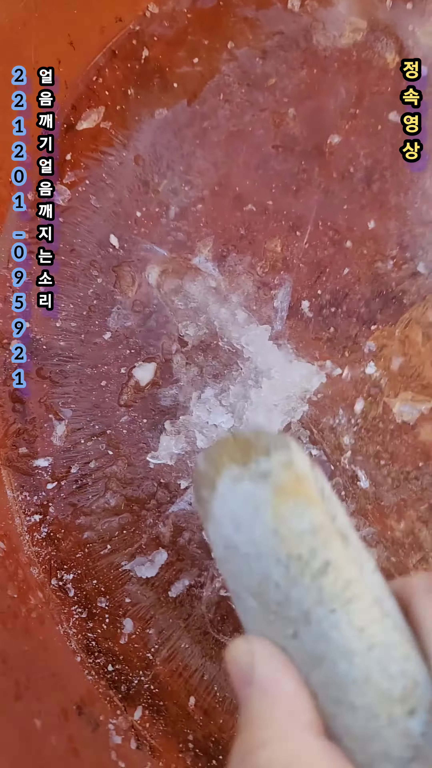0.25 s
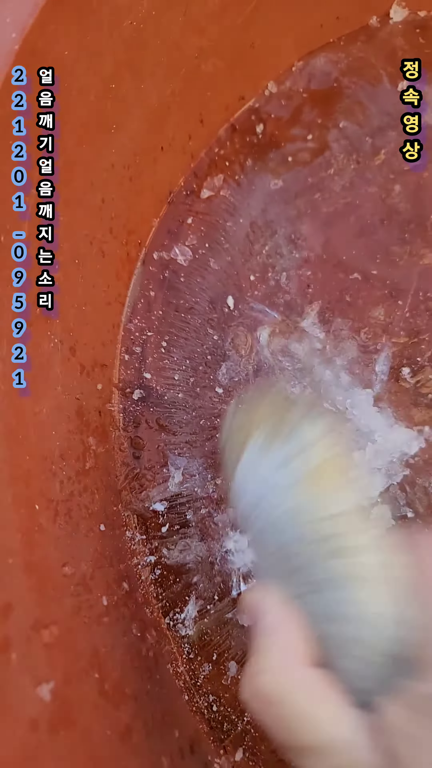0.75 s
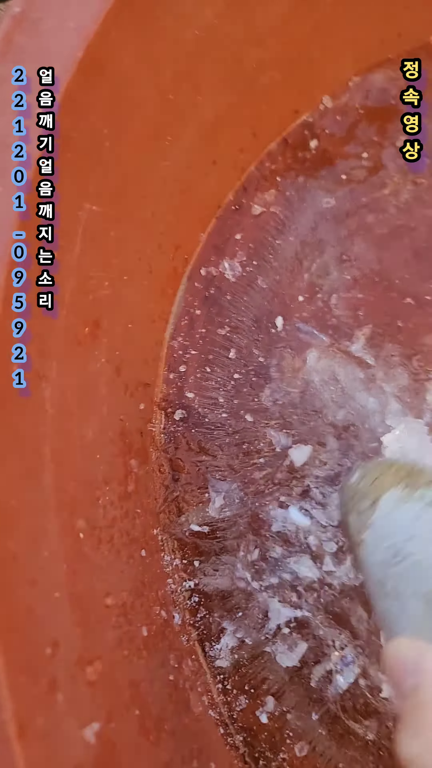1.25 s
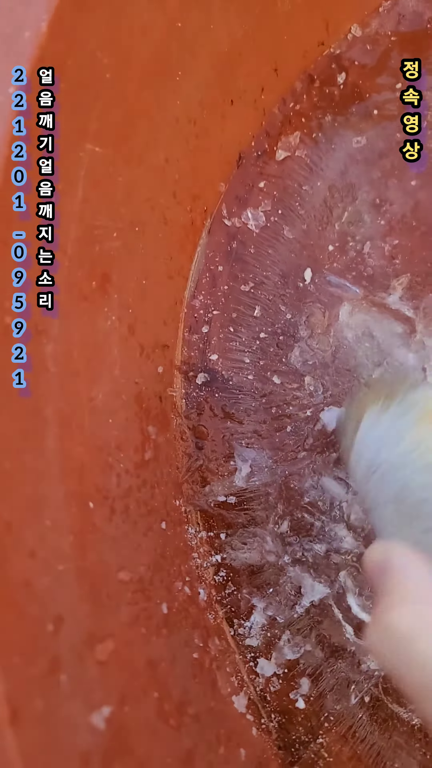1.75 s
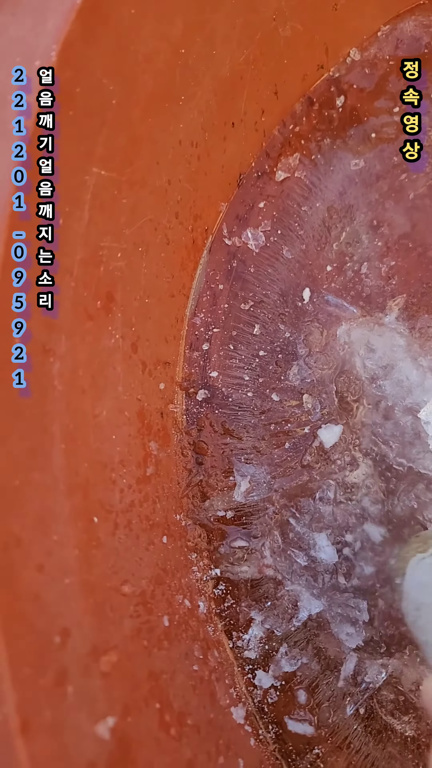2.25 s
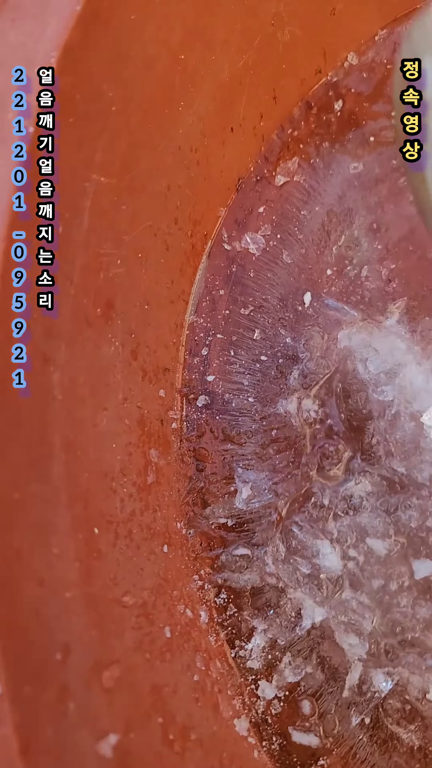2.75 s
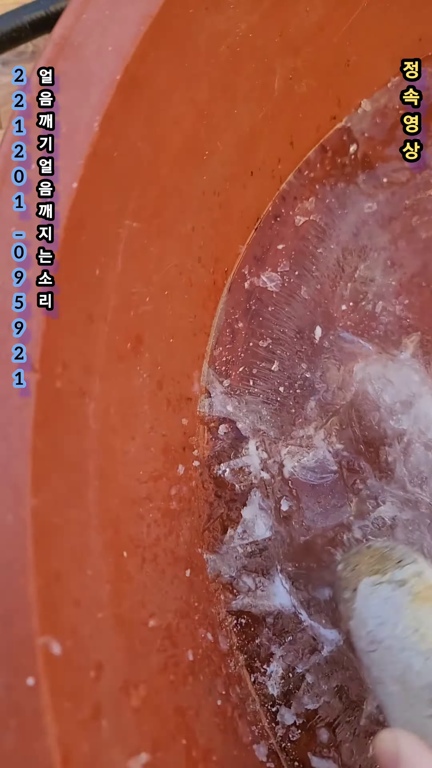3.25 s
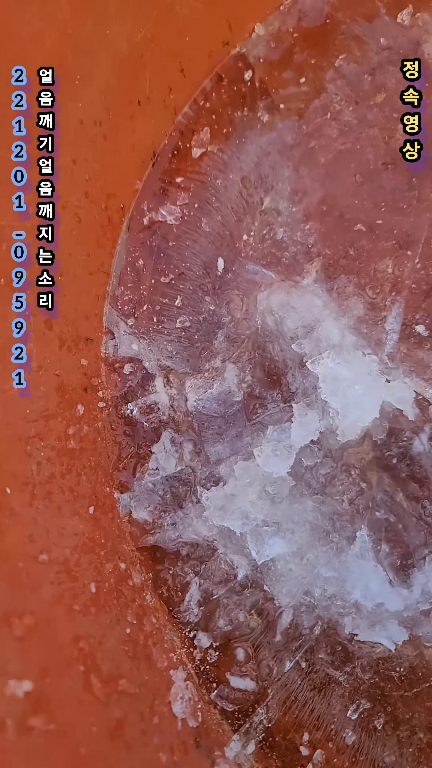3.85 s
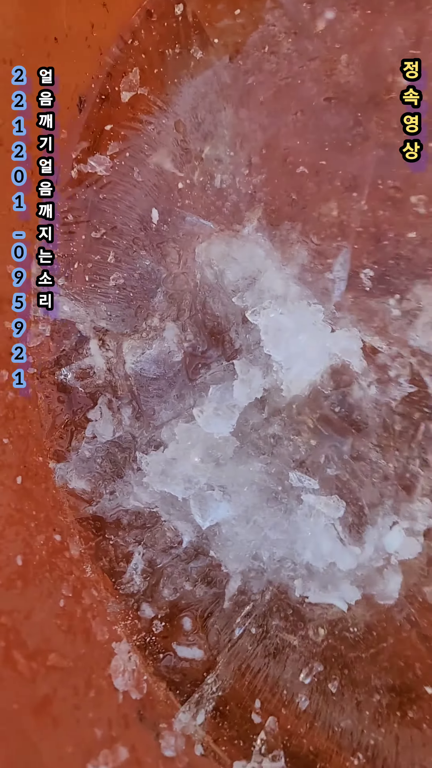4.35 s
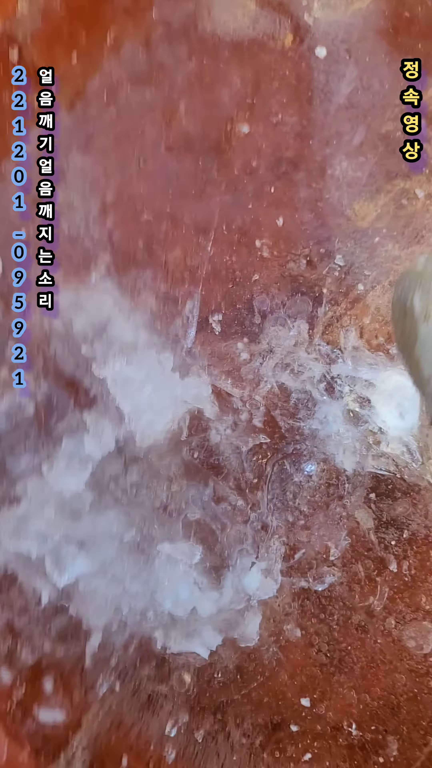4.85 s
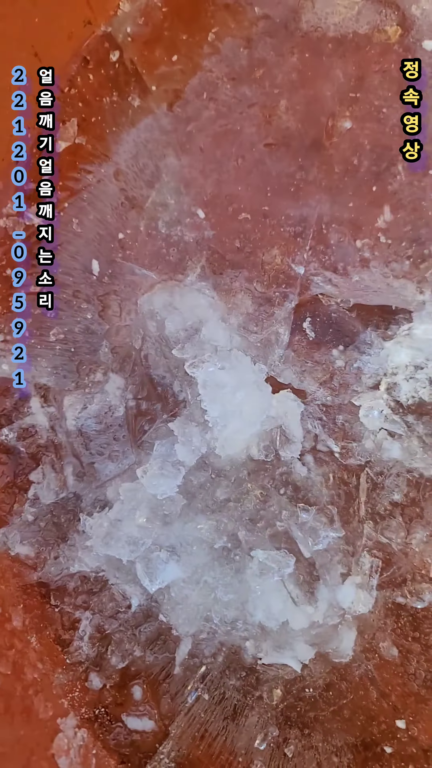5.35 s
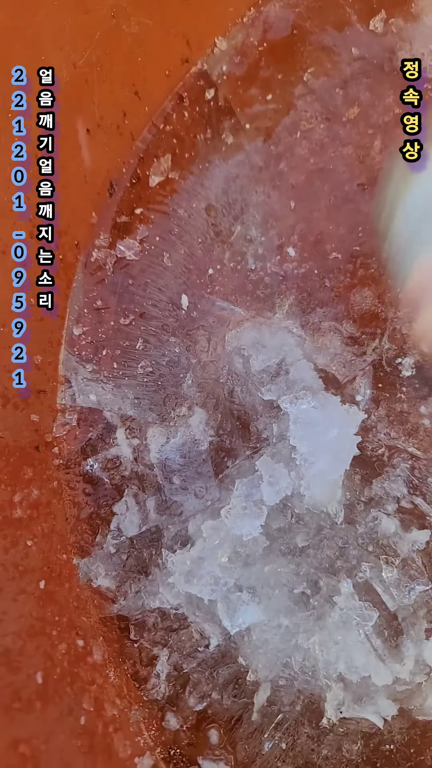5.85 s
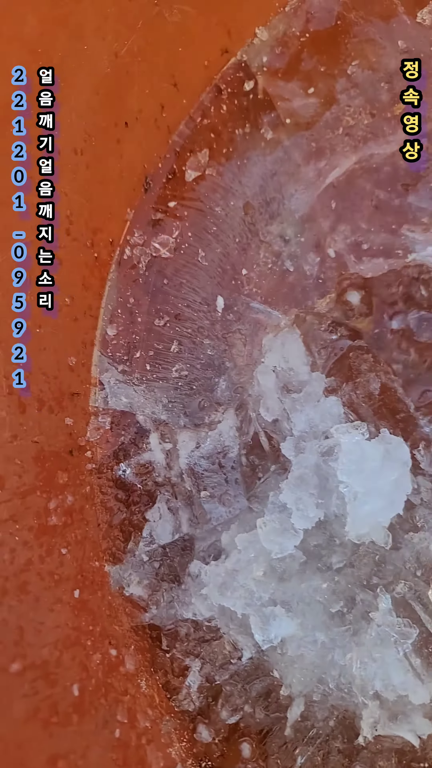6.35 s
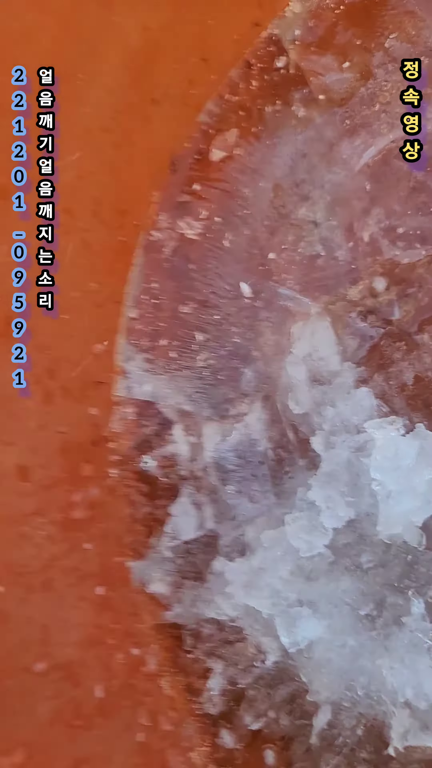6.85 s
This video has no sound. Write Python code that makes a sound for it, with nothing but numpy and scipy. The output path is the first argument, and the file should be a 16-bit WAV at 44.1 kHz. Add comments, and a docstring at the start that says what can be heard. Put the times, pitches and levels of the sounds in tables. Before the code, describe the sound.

A stone pounds ice in a big plastic tub about three times a second, with sharp cracks, hollow booms and crunching shards over a low hum.

```python
"""Pounding ice in a tub

A hand-held stone pounds the ice in a big plastic tub twenty times, close to a two-port microphone.
Each blow adds fading tones for sheet, stone, slab and tub to shaped noise for cracks and crumbling.
After the first ten blows and the last, the tub bounces on the ground, ever quicker and weaker.
Chips tick, shards clink, pieces grind and slush fizzes, all from short tones or puffs of noise.
A low hum made of sine waves lies underneath, in dull outdoor noise."""
import sys
import numpy as np
from scipy import signal
from scipy.fft import rfft, irfft, next_fast_len
from scipy.io import wavfile

SR = 44100
rng = np.random.default_rng(int(sys.argv[2]) if len(sys.argv) > 2 else 0)


def put_to_file(sound):
    """Save the sound as 16-bit audio at rate SR, in the file named by the first command-line argument."""
    columns = np.atleast_2d(sound).T  # one column per channel
    safe = np.clip(columns, -1, 1)
    whole_steps = np.round(safe * 32767)
    wavfile.write(sys.argv[1], SR, whole_steps.astype(np.int16))


N = 313992  # length of the scene in samples
T = np.arange(SR // 2) / SR  # the life of one sound, s

# Level and treble columns of BLOWS and CHIPS are relative: each layer adds its own offset or scaling.
# The blows: t/s, tub thump level/dB, sheet f/Hz, sheet level/dB, clack f/Hz, clack level/dB,
# crack level/dB, crack treble/dB, crushing level/dB, slab f/Hz, slab level/dB
BLOWS = [(0.122, -10.5, 524, -11.5, 640, -16, -11, -8, -25.5, 3310, -13),
         (0.437, -10.5, 497.7, -1.5, 732, -13.5, -11.5, -15.5, -27, 1430, -14),
         (0.768, -10.5, 545, -10.5, 794, -6.5, -8.5, -10.5, -13, 1570, -31.5),
         (1.135, -12, 508.6, -6.5, 787, -11, -17, -9, -24, 1120, -13.5),
         (1.478, -13.5, 468, -9, 847, -22, -12, -10, -25, 1935, -11),
         (1.764, -15, 495, -17, 823, -12, -16.5, -12, -12.5, 990, -28.5),
         (2.093, -20.5, 480, -20, 875, -4.5, -9, -14.5, -15, 1350, -27.5),
         (2.507, -11.5, 493, -10, 788, -10, -10.5, -15.5, -20.5, 1040, -10),
         (2.846, -9, 477.5, -5, 695, -5, -9, -12, -18, 1520, -33.5),
         (3.177, -21.5, 493.6, -6.5, 723, -6.5, -20.5, -12, -19, 940.2, -13.5),
         (3.542, -7.5, 542, -14.5, 749, -4, -8.5, -6, -19.5, 3080, -22.5),
         (3.851, -10.5, 511, -6.5, 733, -4.5, -9, -7.5, -26, 936, -45.5),
         (4.138, -6.5, 503, -9.5, 812, -13, -8, -11, -26.5, 960, -33),
         (4.454, -2, 511, -6.5, 670, -4.5, -9, -15, -27, 1890, -22.5),
         (4.769, -3.5, 529, -11, 820, -14, -13.5, -3, -28.5, 1170, -16.5),
         (5.131, -4, 450, -15, 812, -4.5, -8.5, -9, -16, 2290, -20),
         (5.522, -8, 489, -14, 842, -8.5, -9.5, -8, -19.5, 5060, -12.5),
         (5.892, -9, 518, -10.5, 740, -6.5, -8.5, -16, -11, 1570, -17.5),
         (6.371, -5, 553, 0, 725, -5.5, -14.5, -9.5, -27, 1010, -19),
         (6.855, -7.5, 448.4, 0, 733, -3, -13.5, -8.5, -23, 1140, -14)]
# Large chips landing and loose pieces snapping: t/s, level/dB, treble/dB
CHIPS = [(0.0149, -32.5, -23.5), (0.3333, -32, -17), (0.351, -31.5, -9), (0.841, -17, -21.5),
         (0.909, -23, -2), (2.9044, -17.5, -19.5), (3.3129, -19, -28), (3.422, -31.5, -24),
         (3.6072, -22.5, -15.5), (3.6661, -19, 3), (3.682, -13.5, -17), (3.9626, -29.5, -10),
         (4.232, -29.5, -13.5), (4.3244, -29.5, -17), (4.362, -33, -9), (5.336, -18, -3),
         (6.0867, -29, -11), (6.2915, -13.5, -25)]
# Broken pieces grinding past each other: t/s, length/s, level/dB, treble/dB
GRINDS = [(0.817, 0.17, -40, -21), (1.183, 0.088, -46.5, 6), (1.811, .14, -45, -2.5),
          (2.191, 0.096, -53, -2), (2.381, 0.21, -47.5, -8), (3.613, 0.075, -36, 1.5),
          (5.16, 0.069, -49.5, 14), (5.568, 0.12, -49.5, 10), (5.913, 0.41, -49.5, -5)]
# The tub dropping back after a blow: first landing t/s, thud level/dB (relative),
# first flight/s, shortening of each next flight/s
BOUNCES = [(0.167, -8.5, .0707, .0287), (0.5046, -6, .0948, .0265), (0.8372, -4.5, .1055, .0315),
           (1.205, -5, .106, .031), (1.536, -6.5, .0925, .028), (1.832, -13, .038, .03),
           (2.147, -8.5, .0514, .0117), (2.563, -7.5, .0806, .0339), (2.924, -5, .1075, .0314),
           (3.244, -5, .1045, .0303), (6.937, -14, .04, .03)]
# The struck spot, as the left port hears the sheet: t/s, lag/ms, left-over-right level/dB
SPOT = [(0.1, -0.13, -8), (3.2, -0.2, 8.5), (3.55, -0.52, -10), (4.45, -0.7, -4.5), (4.77, -1, -6),
        (5.13, -1.17, -1), (5.52, -0.14, -5.5), (5.89, 0.44, 3.5), (6.86, 1, -3.5)]

# Tones of the water-filled tub: f/Hz, level/dB, 60 dB fade/s before extra damping
TUB_TONES = [(85.6, 0.5, 0.88), (172.2, -4.5, 0.21), (229, 4, 0.053), (268.8, 8, 0.085), (327.6, 3, 0.081)]
# Tones of stone on ice: multiple of the clack f, level/dB, 60 dB fade/s
CLACK_TONES = [(1, -2.5, .045), (1.14, -12, 0.048), (1.45, -7, 0.041), (1.9, -13, 0.034),
               (2.3, -14.5, 0.011)]
# Tones of the bending ice sheet: multiple of the sheet f, level/dB, 60 dB fade/s
SHEET_TONES = [(1, 1.5, 0.035), (.88, -8, 0.038)]
# Sine waves in the hum: multiple of the hum f, level/dB
HUM_LINES = [(1, 3), (1.47, -30), (2, -15.5), (3.95, -21), (10.07, -30), (10.7, -29.5)]

# Noise colour of cracking ice: f/Hz, level/dB
CRACK_COLOUR = [(300, -27), (900, -2), (1600, -1), (2400, -10), (4000, -12.5), (5600, -12), (9000, -18),
                (13000, -16), (16000, -20.5)]
# Noise colour of crumbling ice: f/Hz, level/dB
CRUSH_COLOUR = [(250, -20), (700, -2), (1600, -0.5), (2500, -10.5), (4500, -11), (6800, -8.5),
                (9500, -15.5), (13000, -8.5), (16000, -21)]
# Noise colour of the tub wall's quick upper ring: f/Hz, level/dB
WALL_COLOUR = [(60, -19), (180, -15.5), (290, -6.5), (400, -6), (500, 4), (620, -16.5), (740, -5.5),
               (850, -8), (1000, -22), (1500, -29), (4000, -44)]
# Noise colour of the tub wall's slow low ring: f/Hz, level/dB
WALL_LOW_COLOUR = [(60, -17), (170, -5.5), (265, -3), (350, -4), (480, -11.5), (620, -21.5), (740, -11),
                   (1000, -35.5), (4000, -75)]
# Noise colour of ticking chips: f/Hz, level/dB
CHIP_COLOUR = [(250, -24.5), (700, -3.5), (1500, -5.5), (3500, -5.5), (7000, 5.5), (9500, 4.5),
               (13000, 15.5), (16000, -15.5)]
# Noise colour of grinding pieces: f/Hz, level/dB
GRIND_COLOUR = [(250, -9), (600, 5), (950, -6.5), (1500, -2), (2200, -10.5), (3200, -5.5), (4600, -10.5),
                (6500, -6), (9500, -15.5), (13000, -10.5), (16000, -18)]
# Noise colour of the outdoor background: f/Hz, level/dB
AIR_COLOUR = [(20, -14.5), (45, 0), (90, 1.5), (140, -9.5), (220, -20.5), (400, -22.5), (700, -27),
              (1100, -32.5), (3000, -40), (4500, -51), (7000, -45), (10000, -58.5), (16000, -55.5)]
# Tone of the left port compared with the right: f/Hz, level/dB
LEFT_PORT_COLOUR = [(70, -1), (250, -0.93), (1200, -1.78), (4000, -0.56), (12000, 1.5)]
# Noise colour of the rumbling air: f/Hz, level/dB
RUMBLE_COLOUR = [(10, -7), (30, -1.5), (70, -4.5), (200, -36.5), (1000, -67.5)]
# Noise colour of the tub's knocking rim: f/Hz, level/dB
RIM_COLOUR = [(300, -28.5), (550, 6.0), (850, 6.5), (1200, -3), (1900, -17.5), (2600, -29), (8000, -42)]

HUM_HZ, HUM_DB, HUM_WAVER_DB, HUM_RISE_S = 69.3, -33.5, 3, 0.11
AIR_DB, RUMBLE_DB = -41.5, -44.5
# The fizz is faint at rest; each blow stirs it up in step with its crushing level
SLUSH_REST_DB, SLUSH_STIR_DB, SLUSH_SETTLE_DB_PER_S = -66.5, -33, 53.5
# Small chips thrown by each blow, with level and treble on the scale of CHIPS
SPRAY_DB, SPRAY_SPREAD_DB, SPRAY_TREBLE_DB = -44.5, 9, -12
SPRAY_SOONEST_S, SPRAY_LATEST_S = .04, .25
# A landing is this much weaker after a flight this long; shorter flights lose more
BOUNCE_LOSS_DB, BOUNCE_FLIGHT_S = 5.5, 0.087
SHORTEST_FLIGHT_S = .034
RIM_DB = -18.5  # rim knock against the thud, before their small final trims
# After a flight longer than this, one edge touches just before the tub lands
TIPPING_FLIGHT_S, TIP_LEAD_S = .069, .039
TIP_THUD_DB, TIP_RIM_DB = -8.5, -21.5
THUD_SCATTER, THUD_LAG_MS = .035, .25  # pitch scatter as a fraction; left port's lag
FRACTURE_S = .0011  # fading time of one tiny fracture's power
EDGE_HZ = 16150  # the microphone's upper limit


def gain_of(db):
    """Turns decibels into a multiplier for the sound wave."""
    return 10 ** (np.asarray(db) / 20)


def evened(x):
    """Scales a sound to an average (rms) strength of 1."""
    return x / np.sqrt(np.mean(x ** 2) + 1e-20)


def sized(x, db):
    """Scales a short sound so that its energy, packed into 10 ms, has this level."""
    packed_power = np.mean(np.sum(x ** 2, -1)) / (SR / 100)
    return gain_of(db) * x / np.sqrt(packed_power + 1e-20)


def coloured(x, points, tilt_db=0, jagged_db=0):
    """Filters without pre-echo; tilt changes the treble, jagged adds chance resonances of odd-shaped pieces."""
    size = next_fast_len(x.shape[-1] + 4096)
    hz = abs(np.fft.fftfreq(size, 1 / SR)) + 1
    f, level_db = np.transpose(points)
    db = np.interp(np.log(hz), np.log(f), level_db)
    # the tilt pivots at 2500 Hz and reaches its full value at 4.5 times that
    db = db + tilt_db * np.clip(np.log(hz / 2500) / np.log(4.5), -.3, 1.1)
    knots = np.linspace(25, 130, 100) ** 2
    db = db + jagged_db * np.interp(hz, knots, rng.standard_normal(len(knots)))
    # the Hilbert transform finds the phase that lets no sound come early
    response = np.exp(np.conj(signal.hilbert(db * np.log(10) / 20)))[:size // 2 + 1]
    return irfft(rfft(x, size) * response, size)[..., :x.shape[-1]]


def dying(t60, rise=1e-4):
    """Gives a soft start, then a steady fade that loses 60 dB in t60 seconds."""
    return (1 - np.exp(-T / rise)) * gain_of(-60 * T / t60)


def ring(modes, pitch=1, rise=1e-4, scatter=0):
    """Adds fading sine waves, the natural tones of a struck body, each detuned a little by chance."""
    out = np.zeros(len(T))
    for multiple, db, t60 in modes:
        hz = multiple * pitch * (1 + scatter * rng.standard_normal())
        out += gain_of(db) * dying(t60, rise) * np.sin(2 * np.pi * hz * T)
    return out


def ports(x, lag_ms, balance_db=0):
    """Feeds two microphone ports: a positive lag delays the left, a positive balance favours it."""
    t = np.arange(len(x)) / SR
    left = np.interp(t - lag_ms / 1000, t, x, left=0)
    return np.array([left * gain_of(balance_db / 2), x / gain_of(balance_db / 2)])


def grains(length, per_s, spread_db):
    """Makes tiny fractures of very unequal size, each a short puff of noise that differs between the ports."""
    happens = rng.random(length) < per_s / SR
    sizes = gain_of(spread_db * np.minimum(rng.exponential(1, length), 4)) * happens
    power = signal.lfilter([1], [1, -np.exp(-1 / (FRACTURE_S * SR))], sizes ** 2)
    return evened(np.sqrt(power) * rng.standard_normal((2, length)))


def add(mix, s, sound):
    """Mixes a sound in at s seconds, leaving out whatever falls outside the scene."""
    start = round(s * SR)
    sound = sound[:, max(-start, 0):]
    part = mix[:, max(start, 0):][:, :sound.shape[1]]
    part += sound[:, :part.shape[1]]


def wavering():
    """Adds slow sine waves with chance starting points into an uneven drift of rms 1."""
    t = np.arange(N) / SR
    return evened(sum(np.sin(2 * np.pi * (f * t + rng.random())) for f in np.geomspace(.4, 6, 14)))


def background():
    """A slightly wavering low hum lies in dull outdoor noise; stirring air rumbles at each port."""
    t = np.arange(N) / SR
    turns = np.cumsum(HUM_HZ * (1 + .008 * wavering())) / SR
    hum = evened(sum(gain_of(db) * np.sin(2 * np.pi * k * turns) for k, db in HUM_LINES))
    hum *= gain_of(HUM_DB + HUM_WAVER_DB * wavering())
    hum *= np.minimum(t / HUM_RISE_S, 1)
    shared, *own = coloured(rng.standard_normal((3, N)), AIR_COLOUR)
    air = gain_of(AIR_DB) * evened(ports(shared, lag_ms=.3) + 0.081 * np.array(own))
    rumble = gain_of(RUMBLE_DB) * evened(coloured(rng.standard_normal((2, N)), RUMBLE_COLOUR))
    return ports(hum, lag_ms=0.39, balance_db=-1.1) + air + rumble


def slush():
    """Crumbs and water settle between the pieces after each blow: a fine fizz with a few separate ticks."""
    t = np.arange(N) / SR
    power = gain_of(SLUSH_REST_DB) ** 2
    for s, *_, crush_db, _, _ in BLOWS:
        stirred_db = crush_db + SLUSH_STIR_DB - SLUSH_SETTLE_DB_PER_S * abs(t - s)
        power = power + (t > s) * gain_of(stirred_db) ** 2
    fine = grains(N, per_s=2500, spread_db=3.5)
    ticks = grains(N, per_s=60, spread_db=4)
    fizz = evened(coloured(fine + 0.4 * ticks, CRUSH_COLOUR, tilt_db=-1))
    return fizz * np.sqrt(power)


def grinding():
    """Tiny fractures swell and fade as slabs slide and crumble; each of four pieces has its own colour."""
    out = np.zeros((2, N))
    for s, length_s, db, treble_db in GRINDS:
        pieces = [grains(len(T), per_s=200, spread_db=4.8) for _ in range(4)]
        rub = sum(coloured(piece, GRIND_COLOUR, treble_db, jagged_db=7.0) for piece in pieces)
        rub = rub[:, :round(length_s * SR)]
        swell = signal.windows.tukey(rub.shape[1], .8)
        add(out, s, gain_of(db) * evened(rub * swell))
    return out


def spray(count):
    """Each blow throws small chips that land after a short flight; lists them in the columns of CHIPS."""
    rows = []
    for s, *_ in BLOWS:
        for late, size in rng.random((count, 2)):
            landing_s = s + SPRAY_SOONEST_S + (SPRAY_LATEST_S - SPRAY_SOONEST_S) * late
            rows.append((landing_s, SPRAY_DB + SPRAY_SPREAD_DB * (2 * size - 1), SPRAY_TREBLE_DB))
    return rows


def chips():
    """Ice ticks on ice as a short puff of noise, with a brief skitter of tiny fractures."""
    out = np.zeros((2, N))
    for s, db, treble_db in CHIPS + spray(count=2):
        skitter = grains(len(T), per_s=900, spread_db=4) * dying(t60=0.07)
        tick = rng.standard_normal((2, len(T))) * dying(t60=0.0091, rise=0.00042)
        chip = coloured(tick + .2 * skitter, CHIP_COLOUR, 1.11 * (treble_db + 4.0), jagged_db=2.5)
        add(out, s, sized(chip, db - 15.5))
    return out


def clinks():
    """Five small shards drop back after each blow and clink; the later they land, the quieter they are."""
    out = np.zeros((2, N))
    for s, *_, crush_db, _, _ in BLOWS:
        for late, height, side in rng.random((5, 3)):
            hz = 1100 * 4 ** height
            tone = ring([(hz, 0, 22 / hz), (hz * 1.6, -4, 14 / hz)])
            clink = ports(sized(tone, crush_db - 23 - 14 * late), lag_ms=side - .5)
            add(out, s + 0.0099 + 0.12 * late, clink)
    return out


def landings():
    """Flights shorten and landings weaken, for at most three flights; yields t/s, thud dB and rim dB."""
    for s, db, flight_s, shorter_s in BOUNCES:
        yield s, db, db + RIM_DB
        for _ in range(3):
            if flight_s < SHORTEST_FLIGHT_S:
                break
            s = s + flight_s
            db = db - BOUNCE_LOSS_DB * BOUNCE_FLIGHT_S / flight_s
            if flight_s > TIPPING_FLIGHT_S:
                yield s - TIP_LEAD_S, db + TIP_THUD_DB, db + TIP_RIM_DB
            yield s, db, db + RIM_DB
            flight_s = flight_s - shorter_s


def rocking():
    """A bending wave runs through the tub's floor, high notes first, comes round again and leaves it ringing."""
    out = np.zeros((2, N))
    for s, thud_db, rim_db in landings():
        hz = (205 + 290 * np.exp(-T / 0.0034)) * (1 + THUD_SCATTER * rng.standard_normal())
        wave = np.sin(2 * np.pi * np.cumsum(hz) / SR) * (T / .0022) ** 2 * np.exp(-T / 0.0026)
        tub_ring = ring(TUB_TONES, rise=0.0088, scatter=0.062) * dying(t60=0.4)
        deep_ring = ring([(75.6, 0, 0.28)], rise=0.0013)
        thud = sized(wave, 0) + sized(tub_ring, -4.5) + sized(deep_ring, -11.5)
        # the wave comes round again upside down
        back = -ring([(183.3, 0, 0.081)], rise=0.00028)
        knock = rng.standard_normal(len(T)) * (dying(t60=0.022) + 0.05 * dying(t60=0.59))
        rim = coloured(knock, RIM_COLOUR)
        add(out, s - .001, ports(sized(thud, thud_db + 0.085), lag_ms=THUD_LAG_MS, balance_db=0.4))
        add(out, s + 0.015, ports(sized(back, thud_db - 7.5), lag_ms=THUD_LAG_MS))
        add(out, s, ports(sized(rim, rim_db + 0.37), lag_ms=0.41))
    return out


def slabs():
    """A slab by each impact rings with two close bending tones, damped by water within a few dozen cycles."""
    out = np.zeros((2, N))
    for s, *_, hz, db in BLOWS:
        t60 = 45 / hz
        tone = ring([(hz, 0, t60), (hz * 1.06, -5, t60)], rise=0.00012)
        slab = ports(sized(tone, db - 1.0), lag_ms=rng.uniform(-0.43, 0.46), balance_db=3.5)
        add(out, s - .001, slab)
    return out


def cracks():
    """Noise makes a faint swell, a sharp fracture with a second just after, then a dry crunch of ice."""
    out = np.zeros((2, N))
    for s, _, _, sheet_db, _, _, crack_db, treble_db, crush_db, _, _ in BLOWS:
        second = np.roll(dying(t60=0.014), round(rng.uniform(0.0022, 0.004) * SR))
        fading = dying(t60=.01) + .2 * second + .15 * dying(t60=.025)
        burst = sized(rng.standard_normal((2, len(T))) * fading, 0)
        # a fading sound played backwards swells up to the blow
        swell = sized(grains(len(T), per_s=2000, spread_db=3) * dying(t60=.035), -17.5)[:, ::-1]
        crack = coloured(np.hstack([swell, burst]), CRACK_COLOUR, treble_db + 9.5, jagged_db=2.5)
        add(out, s - len(T) / SR, sized(crack, crack_db - 0.5))

        crumbs = grains(len(T), per_s=2000, spread_db=4.2)
        crunch = crumbs * (dying(t60=0.12, rise=0.0015) + 0.076 * dying(t60=0.36, rise=.01))
        crunch = coloured(crunch, CRUSH_COLOUR, 0.55 * (treble_db + 6.0))
        add(out, s + 0.0035, sized(crunch, crush_db - 4.0))

        # the low notes swell in too
        low_noise = coloured(rng.standard_normal(len(T)), WALL_COLOUR)
        press = ports(low_noise, lag_ms=0.41) * dying(t60=0.032)
        add(out, s - len(T) / SR, sized(press, sheet_db - 13.0)[:, ::-1])
    return out


def knocks():
    """The sheet bends, the stone clacks and the tub booms in fading tones; its wall rings on in noise."""
    out = np.zeros((2, N))
    times, lags, balances = np.transpose(SPOT)
    for s, thump_db, sheet_hz, sheet_db, clack_hz, clack_db, *_ in BLOWS:
        sheet = ring(SHEET_TONES, sheet_hz, rise=0.014)
        clack = ring(CLACK_TONES, clack_hz, rise=0.0022, scatter=0.015)
        thump = ring(TUB_TONES, rise=0.00018, scatter=0.03) * dying(t60=0.25)

        # the wall's strength follows the sheet and clack levels together
        shared, *own = rng.standard_normal((3, len(T)))
        shake = ports(shared, lag_ms=0.42) + 0.51 * np.array(own)
        strike_db = 20 * np.log10(np.hypot(gain_of(sheet_db), gain_of(clack_db)))
        # high wall notes die first, so the ring sinks in pitch
        upper_wall = coloured(shake, WALL_COLOUR) * dying(t60=0.1, rise=0.014)
        low_wall = coloured(shake, WALL_LOW_COLOUR) * dying(t60=0.31, rise=0.0014)
        wall = sized(upper_wall, strike_db - 5) + sized(low_wall, strike_db - 12)

        lag_ms, balance_db = np.interp(s, times, lags), np.interp(s, times, balances)
        add(out, s - .0035, ports(sized(sheet, sheet_db + 2.0), lag_ms, balance_db))
        add(out, s - .001, ports(sized(clack, clack_db - 0.5), lag_ms=0.46, balance_db=1.1))
        add(out, s, ports(sized(thump, thump_db + .2), lag_ms=0.063, balance_db=1.5))
        add(out, s, wall)
    return out


def scene():
    """Adds all layers together, from the background to the blows."""
    surroundings = background() + slush() + grinding()
    after_blows = chips() + clinks() + rocking()
    return surroundings + after_blows + slabs() + cracks() + knocks()


def record(dry):
    """Gives the left port its brighter tone, cuts overloaded peaks flat, then removes the highest treble."""
    heard = np.array([coloured(dry[0], LEFT_PORT_COLOUR), dry[1]])
    clipped = np.clip(heard, -.99, .99)
    band_limit = signal.firwin(255, EDGE_HZ, window=("kaiser", 8), fs=SR)
    return signal.oaconvolve(clipped, band_limit[None], "same")


dry = scene()
out = record(dry)
put_to_file(out)
```